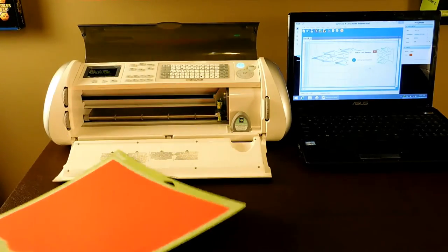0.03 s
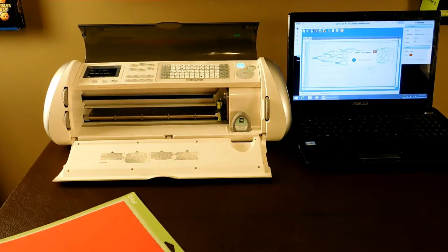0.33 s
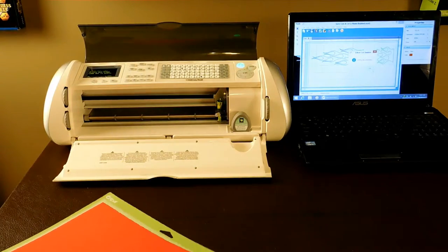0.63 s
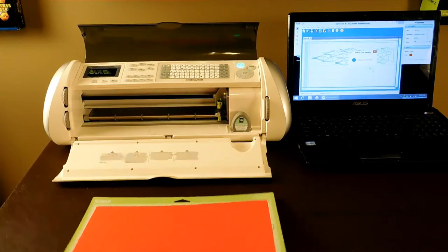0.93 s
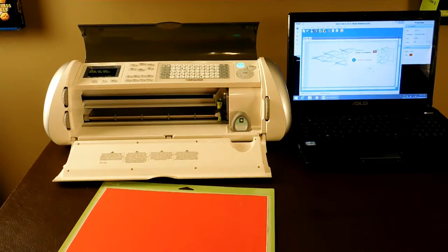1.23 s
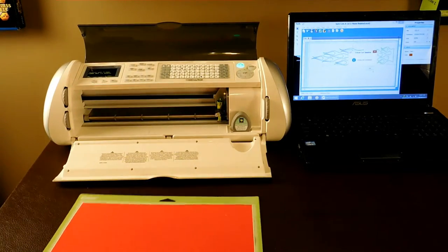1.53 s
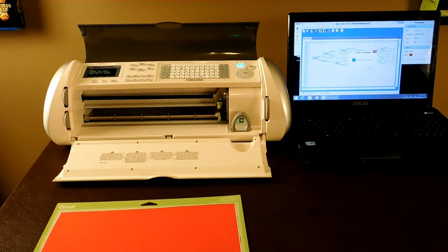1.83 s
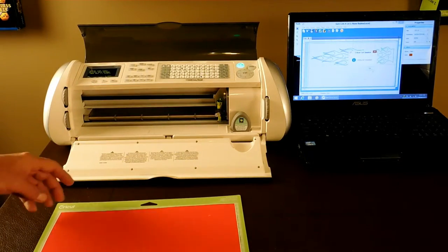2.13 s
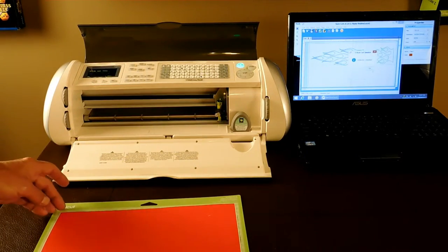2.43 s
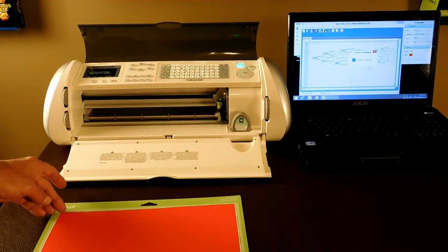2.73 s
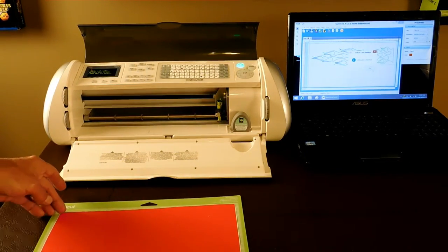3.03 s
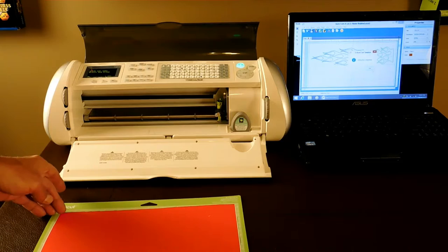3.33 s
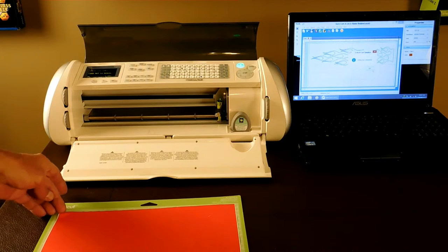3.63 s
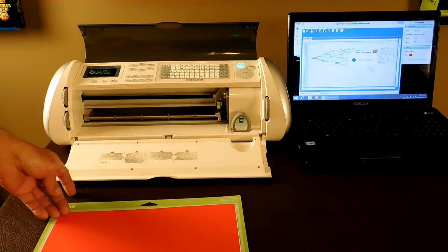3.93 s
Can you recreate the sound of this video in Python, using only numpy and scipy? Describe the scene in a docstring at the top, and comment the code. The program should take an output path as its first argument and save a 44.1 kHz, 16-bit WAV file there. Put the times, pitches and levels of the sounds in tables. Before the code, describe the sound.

A stiff plastic mat scrapes onto a table in two quick, slightly squeaky strokes, flops down and slides softly into place. Fingertips then tick on it and a corner snaps down, in a small room with steady hiss.

```python
"""Two scraping strokes come first: a stiff plastic cutting mat with a vinyl sheet on it is dragged
onto a table. It sticks and slips thousands of times a second, which makes it ring, and its edge
catches and squeaks. The mat flops down and is slid softly into place. Fingertips tick on it, and a
corner snaps against the table, which rings briefly. Each knock is a click with a quick noisy tail.
A small room adds a short echo and a steady hiss."""
import sys
import numpy as np
from scipy import signal
from scipy.fft import rfft, irfft
from scipy.io import wavfile
from scipy.ndimage import uniform_filter1d

SR = 44100
rng = np.random.default_rng(int(sys.argv[2]) if len(sys.argv) > 2 else 0)


def wav_record(signal):
    """Record a signal, one row per channel, as 16-bit PCM in the file named by sys.argv[1]."""
    frames = np.transpose(np.atleast_2d(signal))
    bounded = np.clip(frames, -1, 1)
    # unit amplitude maps onto the largest positive 16-bit level
    quanta = np.round(bounded * 32767).astype(np.int16)
    wavfile.write(sys.argv[1], SR, quanta)


N = 176400
TIME = np.arange(N) / SR

# How hard the mat rubs in each move; scene() trims these levels
# (time [s], scrape level [dB], grit level [dB])
DRAG_FORCE = [(0,-44.5,-68),(.09,-40,-63),(.124,-35.5,-58),(.14,-35,-56),(.2,-33,-53.5),(.215,-48,-53),(.24,-60,-56)]  # first stroke, mat held bowed
SCUFF_FORCE = [(.205,-42.5,-66),(.232,-41.5,-60),(.247,-52,-57),(.255,-41,-55),(.29,-48,-60),(.303,-38,-56),(.34,-48,-68)]  # the edge bumps along between the strokes
SWEEP_FORCE = [(.288,-58,-59),(.302,-53,-50),(.328,-48.5,-52),(.358,-37,-52.5),(.377,-34.5,-46.5),(.41,-39,-53.5),(.448,-43,-49),(.478,-48.5,-59),(.505,-58.5,-67),(.6,-69,-76)]  # second stroke, mat flattening
PUSH_FORCE = [(.8,-77,-81),(.954,-58.5,-85),(1.08,-55.5,-70),(1.118,-53.5,-65.5),(1.16,-56,-79),(1.21,-72,-78)]  # a soft push across the table
NUDGE_FORCE = [(1.2,-72,-80),(1.252,-59.5,-67.5),(1.33,-63.5,-73),(1.372,-58.5,-79),(1.44,-82,-84),(1.49,-59,-75),(1.53,-80,-87),(1.72,-66.5,-78),(1.802,-57,-66),(1.84,-61,-73),(1.888,-75,-84),(1.94,-64,-75),(2.1,-68.5,-82)]  # small slides into place
# The tone of each sound, from bass to treble (frequency [Hz], relative level [dB])
DRAG_TONE = [(100,-44),(300,-40),(470,-17),(650,-6),(1050,-6),(1350,-2),(1800,-1),(2250,-5),(2700,-5),(3500,-11),(5000,-18.5),(8000,-30),(16000,-57)]
GRIT_TONE = [(500,-37),(2500,-11),(4000,-3),(5000,-0.5),(7000,-2),(10000,-2),(13000,-5),(16000,-12)]
HISS_TONE = [(20,0),(33,-4),(64,-2),(119,-4),(160,-4),(350,-4.5),(480,-5.5),(600,-3.7),(1040,-3),(1670,-5),(2400,-7.3),(5400,-16.7),(15500,-22)]
CATCH_TONE = [(100,-31),(350,-18),(700,1.5),(1500,4.5),(3000,-5),(6000,-15),(16000,-40)]
SCUFF_TONE = [(100,-37),(420,-26),(600,-3.5),(800,-0.5),(1100,-3.5),(1350,-7.5),(1900,-5),(2600,-9),(4000,-12.5),(8000,-21.5),(16000,-52)]
SWEEP_TONE = [(100,-33),(450,-23),(750,-2),(1200,-0.5),(1700,0.5),(2100,-2),(2600,-3),(3400,-7.5),(5000,-16),(6800,-15),(8500,-25),(16000,-41)]
FLOP_TONE = [(40,-12),(100,-6),(150,3.5),(250,-7.5),(420,3.5),(560,-3.5),(780,-2),(1200,-8.5),(3000,-19.5),(16000,-38)]
PUSH_TONE = [(100,-22),(600,-11),(900,2.5),(1150,-9),(1500,-1.5),(2200,-3),(2700,-1),(3300,-3),(4000,-9.5),(7000,-23),(16000,-40)]
TICK_TONE = [(100,-4),(700,-3),(2000,5),(3000,1),(4000,-6.5),(7000,-15),(16000,-16)]
NUDGE_TONE = [(100,-11),(350,-8),(560,-3),(900,-6),(1450,5),(2000,0.5),(2700,-2.5),(3500,-6),(7000,-24),(16000,-40)]
SNAP_TONE = [(40,-8),(150,-8),(330,3),(520,6.5),(880,-7),(1300,0.5),(1650,-5),(1950,-0.5),(2500,-12),(3000,-7),(3500,-13),(4000,-9.5),(4600,-10),(5200,-7),(6100,-14),(9000,-14.5),(12000,-8.5),(16000,-20)]
# Modes, the pitches the mat rings at in each shape (frequency [Hz], width [Hz], relative level [dB])
BOWED_MODES = [(685,14,3),(1028,62,-2),(1628,28,4.5),(1760,40,3.5),(1920,51,3),(2610,34,-1.5),(2880,26,-13),(2930,43,-7),(3850,21,-8)]
FLAT_MODES = [(1090,44,-6),(1160,40,-0.5),(1460,44,-5.5),(2010,15.5,2.5),(2520,38,-3.5),(2640,36,-31.5),(2950,39,-14),(3770,46,-16),(5380,56,-17),(6450,40,-20)]
LYING_MODES = [(915,60,2),(1400,55,4.5),(2820,130,4),(3170,140,3)]
# Knocks (time [s], level [dB])
CATCHES = [(.120,-13.5),(.193,-10.5),(.251,-16.5),(.300,-17.5),(.324,-18.5)]  # the edge catches and lets go
FLOPS = [(.652,-21.5),(.656,-28.5),(.660,-24.5),(.724,-25),(1.368,-29.5)]  # the mat flops onto the table
TICKS = [(1.111,-38),(3.062,-30.5),(3.244,-28.5),(3.343,-31.5),(3.455,-27.5),(3.803,-33)]  # fingertips tick on the mat
SNAPS = [(3.6162,-18.5),(3.6222,-21.5)]  # a corner snaps down and bounces
# Short shudders (middle time [s], half length [s], pitch [Hz], level [dB])
SQUEAKS = [(.123,0.011,1630,-35),(0.206,0.0059,990,-37.5),(.231,0.0078,1130,-40),(.374,.008,2895,-30.5),(.374,0.0062,6800,-46.5),(0.382,0.009,1140,-39),(.388,0.01,2100,-37)]  # the edge judders
BUCKLE = (.140,.024,410,-52)  # the mat buckles with one low wobble
# The table top rings under the snap (frequency [Hz], level [dB], time to fade by 60 dB [s])
TABLE_MODES = [(168,-63,0.17),(291,-56,0.2),(372,-54.5,0.17),(519,-56,.12)]
# How long the room echoes (frequency [Hz], time to fade by 60 dB [s])
ROOM_DECAY = [(150,0.29),(1000,0.2),(4000,0.25),(14000,0.28)]
# How alike the left and right channels are (frequency [Hz], likeness [0-1])
MAT_LIKENESS = [(100,0.9),(300,0.2),(650,0.96),(1400,0.91),(3000,0.67),(7000,0.23),(15000,.1)]
HISS_LIKENESS = [(30,0.0021),(130,0.015),(300,0.15),(640,0.12),(1400,0.12),(3000,0.075),(15000,0)]
TABLE_LIKENESS = [(100,1),(500,.93),(1200,0.3),(3000,0.6),(15000,0.2)]  # knocks carried by the table


def amp(db):
    """Turns decibels into a number to multiply by."""
    return 10 ** (np.asarray(db) / 20)


def unit(x):
    """Scales a signal to an average power of 1."""
    return x / np.sqrt(np.mean(x ** 2) + 1e-20)


def look_up(points, hz):
    """Reads between a table's rows on a pitch-like (logarithmic) scale."""
    row_hz, value = np.transpose(points)
    return np.interp(np.log(hz + 1), np.log(row_hz + 1), value)


def shape_tone(x, tone, modes=(), modes_db=0):
    """Filters a sound to give it a broad tone and any ringing pitches."""
    hz = abs(np.fft.fftfreq(8192, 1 / SR))
    power = amp(look_up(tone, hz)) ** 2
    for mode_hz, width, db in modes:
        power += amp(db + modes_db) ** 2 / (1 + ((hz - mode_hz) / width) ** 2) ** 2
    # Minimum phase: the ringing comes after each click, never before it.
    spectrum = np.exp(np.conj(signal.hilbert(np.log(power) / 2)))
    ring = np.fft.ifft(spectrum).real[:len(hz) // 2]
    return signal.oaconvolve(x, ring[None] / np.linalg.norm(ring), axes=1)[:, :x.shape[1]]


def stereo(x, likeness):
    """Blends two unrelated channels until they are as alike as the table asks."""
    first, second = rfft(x)
    hz = np.fft.rfftfreq(x.shape[1], 1 / SR)
    alike = np.clip(look_up(likeness, hz), -1, 1)
    mid, side = first * np.sqrt((1 + alike) / 2), second * np.sqrt((1 - alike) / 2)
    return irfft(np.array([mid + side, mid - side]), x.shape[1])


def waver(rate_hz):
    """A smooth random wobble, mostly slower than rate_hz."""
    hz = np.fft.rfftfreq(N, 1 / SR)
    return unit(irfft(rfft(rng.standard_normal(N)) / (1 + (hz / rate_hz) ** 4), N))


def slips(per_s, spread_db):
    """The mat sticks and slips at random, making tiny clicks of uneven size."""
    size = amp(spread_db * np.minimum(rng.exponential(1, (2, N)), 4))
    direction = rng.choice([-1, 1], (2, N))
    slipping = rng.random((2, N)) < per_s / SR
    return stereo(unit(size * direction * slipping), MAT_LIKENESS)


def rub_strength(force):
    """How strong the scrape and the grit are during a move; both are silent outside it."""
    times, scrape_db, grit_db = np.transpose(force)
    moving = (TIME >= times[0]) & (TIME <= times[-1])
    fade = uniform_filter1d(moving * 1., size=500)
    return [amp(np.interp(TIME, times, db)) * fade for db in (scrape_db, grit_db)]


def stroke(force, tone, modes=(), modes_db=0, scrape_db=0, grit_db=0, clump_db=0):
    """Clumps of slips make the mat scrape and ring; finer grit sizzles above."""
    clumps = unit(amp(clump_db * waver(rate_hz=110)))
    scrape_gain, grit_gain = rub_strength(force)
    scrape = slips(per_s=3500, spread_db=1.52) * clumps * scrape_gain * amp(scrape_db)
    grit = slips(per_s=9000, spread_db=2.5) * clumps * grit_gain * amp(grit_db)
    return shape_tone(scrape, tone, modes, modes_db) + shape_tone(grit, GRIT_TONE)


def room_hiss(level_db=-56.18, waver_db=0.36):
    """Steady room noise whose level wavers slightly."""
    noise = stereo(rng.standard_normal((2, N)), HISS_LIKENESS)
    return amp(level_db + waver_db * waver(rate_hz=14)) * unit(shape_tone(noise, HISS_TONE))


def room_echo(x):
    """Reflections blur into a short tail, each frequency fading at its own speed."""
    noise = stereo(rng.standard_normal((2, SR // 2)), MAT_LIKENESS)
    hz, t, bands = signal.stft(noise, SR, nperseg=256)
    fade = amp(-60 * t / look_up(ROOM_DECAY, hz)[:, None])
    tail = signal.istft(bands * fade, SR, nperseg=256)[1]
    tail[:, :SR // 200] = 0  # no echo for the first 5 ms
    return signal.fftconvolve(x, tail / np.linalg.norm(tail[0]), axes=1)[:, :N]


def knocks(rows, tone, likeness, scatter_db, scatter_s):
    """Each knock is a click that scatters quickly off the table and nearby things."""
    out, t = np.zeros((2, N)), TIME[:SR // 8]
    for start_s, db in rows:
        scatter = stereo(rng.standard_normal((2, len(t))), likeness) * np.exp(-t / scatter_s)
        hit = amp(scatter_db) * scatter / np.linalg.norm(scatter[0])
        hit[:, 0] += 1  # the click itself
        slot = out[:, round(start_s * SR):][:, :len(t)]
        slot += amp(db) * unit(hit)[:, :slot.shape[1]] / np.sqrt(len(t))
    return shape_tone(out, tone)


def shudders(rows, wobble_hz):
    """For a moment the mat shakes at an unsteady pitch: a squeak or a low wobble."""
    out, wobble = np.zeros(N), wobble_hz * waver(rate_hz=244)
    for middle_s, half_s, hz, db in rows:
        swell = np.exp(-((TIME - middle_s) / half_s) ** 2)
        phase = 2 * np.pi * np.cumsum(hz + wobble) / SR
        out += amp(db) * swell * unit(np.sin(phase))
    return out


def table_ring():
    """The snapping corner sets the table top ringing with low, fading notes."""
    t = np.maximum(TIME - SNAPS[0][0], 0)
    return sum(amp(db - 60 * t / fade_s) * np.sin(2 * np.pi * hz * t) for hz, db, fade_s in TABLE_MODES)


def scene(right_louder_db=0.97):
    """Adds up the mat, the table and the room, all a little to the right."""
    mat = stroke(DRAG_FORCE, DRAG_TONE, BOWED_MODES, modes_db=4.5,
                 scrape_db=-0.5, grit_db=-2.5, clump_db=-0.6)
    mat += stroke(SCUFF_FORCE, SCUFF_TONE, scrape_db=-1, grit_db=-3, clump_db=3)
    mat += stroke(SWEEP_FORCE, SWEEP_TONE, FLAT_MODES, modes_db=7.5,
                  scrape_db=1.6, grit_db=1.9, clump_db=1.7)
    mat += stroke(PUSH_FORCE, PUSH_TONE, LYING_MODES, modes_db=-4, scrape_db=-0.6, grit_db=2)
    mat += stroke(NUDGE_FORCE, NUDGE_TONE, scrape_db=1.2, grit_db=1, clump_db=1.5)
    mat += shudders(SQUEAKS, wobble_hz=130) + shudders([BUCKLE], wobble_hz=60)
    mat += knocks(CATCHES, CATCH_TONE, MAT_LIKENESS, scatter_db=9, scatter_s=0.014)
    taps = knocks(FLOPS, FLOP_TONE, TABLE_LIKENESS, scatter_db=3.5, scatter_s=0.019)
    taps += knocks(TICKS, TICK_TONE, MAT_LIKENESS, scatter_db=22, scatter_s=0.014)
    taps += knocks(SNAPS, SNAP_TONE, TABLE_LIKENESS, scatter_db=4, scatter_s=0.01) + table_ring()
    echo = amp(-7.5) * room_echo(mat) + amp(-9.5) * room_echo(taps)
    balance = amp([[-right_louder_db / 2], [right_louder_db / 2]])
    return (mat + taps + echo + room_hiss()) * balance


def record(dry):
    """Cuts away the very highest treble."""
    cutoff_hz = 15850
    low_pass = signal.firwin(511, cutoff_hz, window=("kaiser", 9), fs=SR)
    return signal.oaconvolve(dry, low_pass[None], "same")


dry = scene()
out = record(dry)
wav_record(out)
```